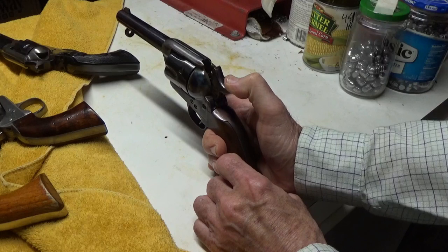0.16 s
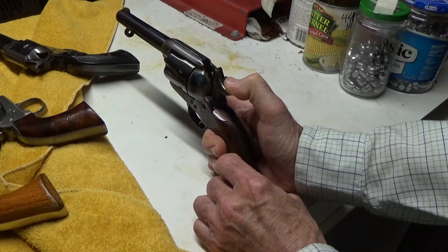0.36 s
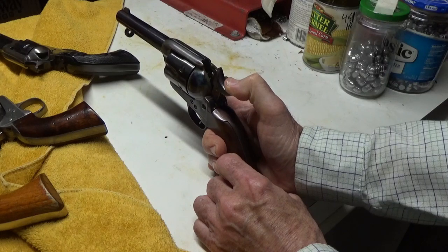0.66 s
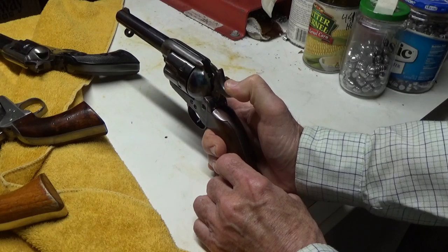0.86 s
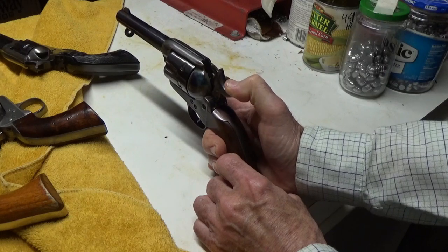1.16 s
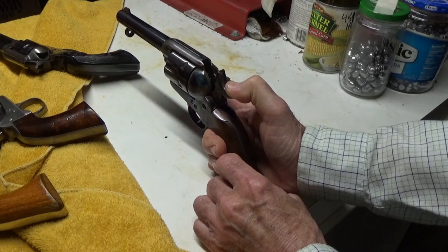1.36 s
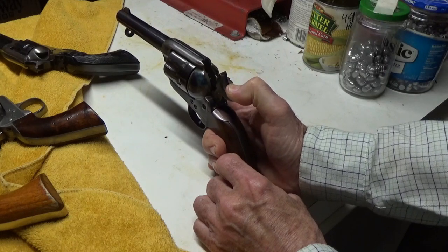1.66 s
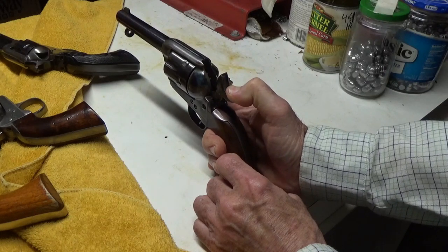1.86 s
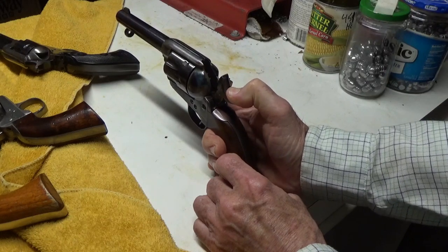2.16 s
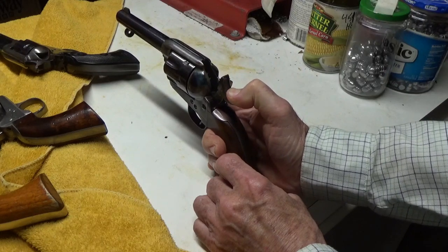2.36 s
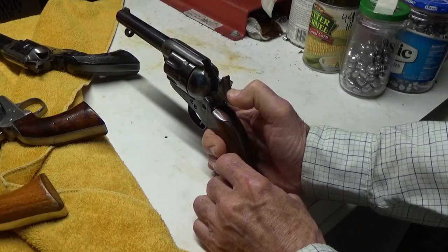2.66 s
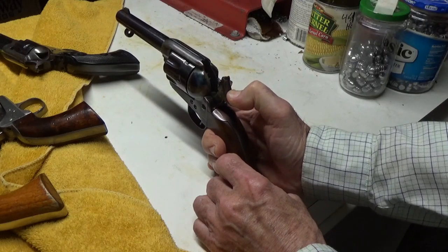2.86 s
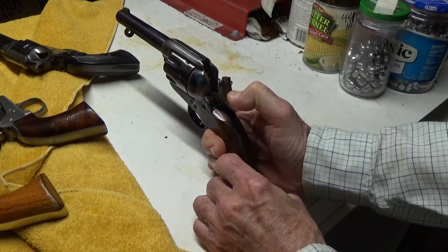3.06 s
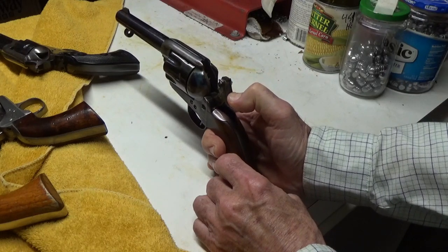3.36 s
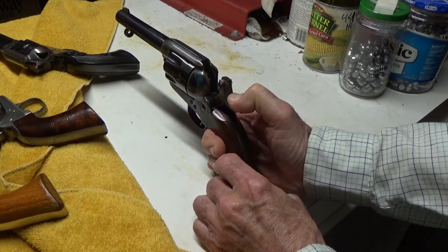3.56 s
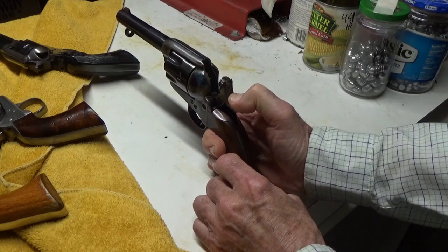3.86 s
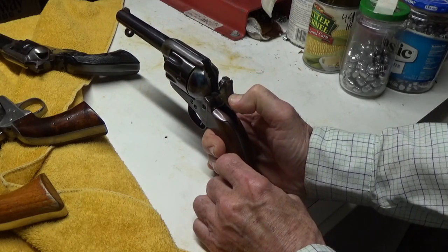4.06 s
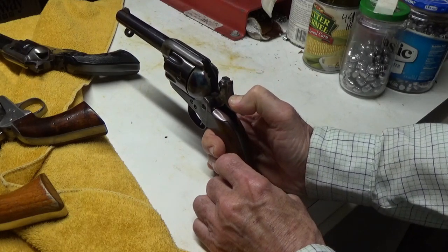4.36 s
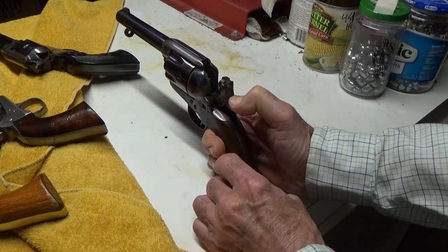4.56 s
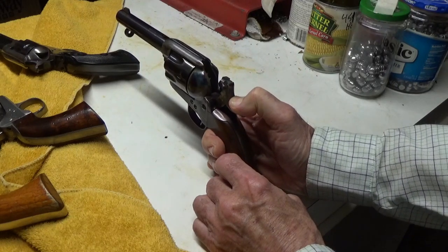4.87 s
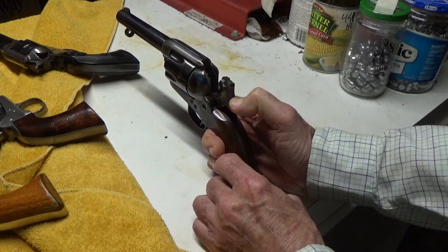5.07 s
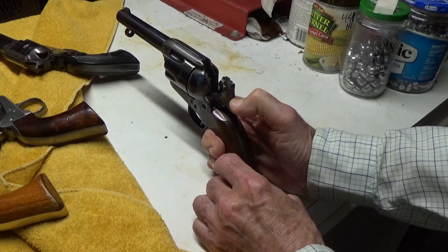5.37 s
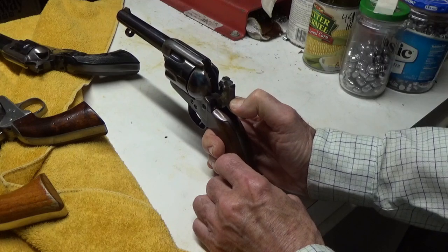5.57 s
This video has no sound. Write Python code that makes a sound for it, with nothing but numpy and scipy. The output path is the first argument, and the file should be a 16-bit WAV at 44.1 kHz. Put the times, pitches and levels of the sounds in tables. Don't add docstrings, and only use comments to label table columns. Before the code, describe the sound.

Three sharp metallic clicks, seconds apart, as a revolver hammer is slowly thumbed back in a quiet small room, over faint hiss.

```python
import sys
import numpy as np
from scipy import signal
from scipy.fft import rfft, irfft
from scipy.io import wavfile
from scipy.ndimage import uniform_filter1d

SR = 44100
rng = np.random.default_rng(int(sys.argv[2]) if len(sys.argv) > 2 else 0)


def gain_from_db(level_db):
    decades = np.asarray(level_db, float) / 20
    return 10 ** decades


def to_wav(s):
    ch = np.atleast_2d(s).T
    pcm = np.round(np.clip(ch, -1, 1) * 32767)
    wavfile.write(sys.argv[1], SR, pcm.astype(np.int16))


N = 252296


def add(track, s, sound):
    i = int(s * SR)
    track[..., i:i + sound.shape[-1]] += sound[..., :N - i]


def unit(x):
    return x / np.abs(x).max()


def shape(x, table):
    hz, gain_db = np.transpose(table)
    n = x.shape[-1]
    bins_hz = np.arange(n // 2 + 1) * SR / n + 1
    gain = gain_from_db(np.interp(np.log(bins_hz), np.log(hz), gain_db))
    return irfft(rfft(x) * gain, n)


def coloured(table, db):
    x = shape(rng.standard_normal(N), table)
    return x * gain_from_db(db) / x.std()


def microphone_hiss():
    # (frequency [Hz], density [dB per Hz])
    middle_hiss = [(20, -10), (87, -1), (250, -2), (900, -7.5), (1200, -5), (1500, -9.5), (11000, -18.5),
                   (14300, -55)]
    # (frequency [Hz], density [dB per Hz])
    side_hiss = [(20, -21.5), (254, -0.45), (1000, -0.8), (1670, -4), (7700, -20), (9440, -18),
                 (11000, -24.5), (14300, -60)]
    return coloured(middle_hiss, -60) + coloured(side_hiss, -62.5) * np.array([[1], [-1]])


def swell(hz, width):
    t = np.arange(int(.08 * SR)) / SR
    envelope = np.e * np.pi * width * t * np.exp(-np.pi * width * t)
    return np.sin(2 * np.pi * hz * t) * envelope


def hands():
    # (time [s], peak level [dB], pitch [Hz], frame knock [dB])
    bumps = [
        (0.3467, -35.5, 320, -9.5),
        (0.6294, -44, 302, -26),
        (2.041, -48.5, 130, -20),
        (2.521, -49.5, 150, -21),
        (2.709, -50.5, 140, -12),
        (3.097, -56, 155, -20),
        (3.258, -53.5, 200, -26),
        (3.999, -53, 137.6, -19.5),
    ]
    out = np.zeros(N)
    frame = swell(1230, 165) + gain_from_db(-1) * swell(500, 120)
    for s, db, hz, frame_db in bumps:
        add(out, s, gain_from_db(db) * (swell(hz, .75 * hz) + gain_from_db(frame_db) * frame))
    room = room_answer([(100, -10.0), (250, -2.5), (600, -1.5), (1500, -6.0), (4000, -12.5)])
    return out, gain_from_db(-39.5) * signal.fftconvolve(out[None], room, axes=1)[:, :N]


def room_answer(colour):
    # (frequency [Hz], t60 [s])
    decay_times = [(150, .33), (300, 0.27), (600, 0.14), (1200, .19), (2500, .17), (5000, .14),
                   (8000, 0.23), (12000, 0.108)]
    # (frequency [Hz], level [dB])
    side_colour = [(100, -11), (300, -12), (600, -2), (1500, -1), (5000, 0), (11000, -3.5)]
    gap_s, side_db = 0.0028, -6
    t = np.arange(SR // 2) / SR
    hz, t60 = np.transpose(decay_times)
    noise = shape(rng.standard_normal((2, len(t))), colour)
    noise = noise / noise.std()
    out = 0
    for centre_hz in 100 * 2 ** np.arange(0, 7.1, .5):
        edges_hz = [centre_hz * 2 ** -.25, centre_hz * 2 ** .25]
        sos = signal.butter(2, edges_hz, "bandpass", fs=SR, output="sos")
        fade = gain_from_db(-60 * t / np.interp(np.log(centre_hz), np.log(hz), t60))
        out = out + fade * signal.sosfiltfilt(sos, noise)
    out = out * np.clip(t / gap_s, 0, 1) ** 2
    side = gain_from_db(side_db) * shape(out[1], side_colour)
    return np.array([out[0] + side, out[0] - side])


def chatter(first_s, blow_db, gap_s, loss_db):
    bounces, jitter = 4, 0.023
    touch_db, rattle_db = -9, -11.5
    k = np.arange(bounces)
    firm_s = first_s + gap_s * (k + jitter * rng.standard_normal(bounces))
    firm_db = blow_db - loss_db * k
    touch = (first_s - gap_s / 2, blow_db + touch_db)
    rattles = zip(firm_s + gap_s / 2, firm_db + rattle_db)
    return [touch, *zip(firm_s, firm_db), *rattles]


def ring(hz, t60, length):
    t = np.arange(int(length * SR)) / SR
    return np.sin(2 * np.pi * hz * t) * np.exp(-np.log(1000) * t / t60)


def resonances(table, length):
    out = 0
    for k, (hz, width, db) in enumerate(table):
        t60 = np.log(1000) / (np.pi * width)
        out = out + (-1) ** k * gain_from_db(db) * width / 300 * ring(hz, t60, length)
    return out


def lockwork(contacts, steel, crack_db):
    out = np.zeros(N)
    body = unit(resonances(steel, .03))
    for s, blow_db in contacts:
        crack = rng.standard_normal(88) * np.exp(-np.arange(88) / (0.00029 * SR))
        crack = np.diff(crack, prepend=0)
        add(out, s, gain_from_db(blow_db) * body)
        add(out, s, gain_from_db(blow_db + crack_db) * crack)
    return signal.sosfilt(signal.butter(2, 2200, "highpass", fs=SR, output="sos"), out)


def cylinder_and_spring(modes):
    return sum(gain_from_db(db) * ring(hz, t60, 0.294) for hz, db, t60 in modes)


def bench(modes, thud, start_s, bench_db, thud_db):
    out = np.zeros(N)
    boom = 0
    for hz, db, t60 in modes:
        boom = boom + gain_from_db(db) * (ring(hz, t60, .4) - 0.36 * ring(hz + 17, t60, .4))
    boom = boom * (1 - np.exp(-np.arange(len(boom)) / (0.019 * SR)))
    add(out, start_s, gain_from_db(bench_db) * unit(boom))
    grip = sum((-1) ** k * gain_from_db(db) * swell(hz, width) for k, (hz, width, db) in enumerate(thud))
    add(out, start_s, gain_from_db(thud_db) * grip)
    return out


def wall_echo(low):
    dull = signal.sosfilt(signal.butter(2, 700, fs=SR, output="sos"), low)
    return gain_from_db(-11.5) * np.roll(dull, int(.019 * SR))


def at_two_ports(steel_clicks):
    return steel_clicks + gain_from_db(-20.5) * np.array([[1], [-1]]) * np.roll(steel_clicks, 12)


def scene():
    # (first firm contact [s], blow [dB], time between bounces [s], loss per bounce [dB], thud delay [s])
    clicks = [
        (.8270, -9, .001017, 0.5, -0.00039),
        (3.4628, 0.6, .00104, 5.5, .0006),
        (5.4226, -7.5, .00104, 4, .0008),
    ]
    # (bench [dB], thud [dB], bare crack [dB], room [dB], ring [dB])
    knocks = [
        (-22, -18.5, -3, -30, -38.5),
        (-28, -24.5, -8, -27.5, -34.5),
        (-39, -33.5, -4, -36, -44),
    ]
    # (frequency [Hz], width [Hz], level [dB])
    steel_modes = [
        [(1838, 80, -19), (3245, 99, -8.5), (3550, 90, -13), (5800, 469, -6.5), (6730, 300, -3.5),
         (7580, 330, -5.5), (8570, 160, -12.5), (8750, 640, -9.5), (10750, 250, -9)],
        [(1922, 370, -22.5), (2760, 230, -12), (3805, 280, -12.5), (4850, 450, -6.5), (6200, 580, -6.5),
         (7970, 253, -11), (9550, 220, -2.5), (10920, 440, -6)],
        [(3000, 1000, -10.5), (3830, 180, -17), (4260, 180, -14), (5470, 300, -7.5), (6620, 310, -3),
         (7850, 620, -10), (8520, 470, -10.5), (10220, 280, -8), (10860, 190, -8.5)],
    ]
    # (frequency [Hz], level [dB], t60 [s])
    long_rings = [
        [(1935, -15, 0.11), (2242, -0.5, 0.081), (5830, -5.5, .08), (6900, -13, .1), (7860, -5, 0.1),
         (7500, 0.7, .13), (7250, -3, .11), (8300, -12, 0.15)],
        [(2790, -5.5, .1), (4650, -9, 0.16), (6194, -9, .08), (7240, -3, .09), (8200, -5, .15), (9500, -1, .12),
         (10000, 0, .12)],
        [(1960, -8, .12), (4300, -5, 0.1), (5550, -1.5, 0.13), (5600, -4, .08), (7500, -3, 0.14),
         (8000, 4, 0.12), (10000, -6, .06)],
    ]
    # (frequency [Hz], level [dB], t60 [s])
    bench_modes = [
        [(140, -16, 0.18), (254, -16, 0.33), (274, -23, .45), (320.5, -3.5, 0.22), (367, -9, 0.16),
         (443, -6, 0.17), (553, -4, 0.1), (710, -20, 0.14), (1276, -17, 0.089)],
        [(209.2, -24, 0.199), (344, -6, 0.16), (472.5, -11.5, 0.18), (545, -1, .2), (561, -2, 0.12),
         (633, -12, .15), (800, -4.5, 0.16), (951, -14, .16), (1210, -12, 0.15), (1290, -14, 0.18)],
        [(256, -13, 0.15), (331.3, -3, 0.15), (442, 0.5, 0.09), (1200, -1.5, 0.088), (1280, -23, .18)],
    ]
    # (frequency [Hz], width [Hz], level [dB])
    grip_thuds = [
        [(231, 102, -11), (392, 100, -2), (476, 100, -10), (803, 98, -23), (1115, 68, -14), (1223, 88, -9),
         (1610, 59, -18.5), (1915, 54, -16), (2295, 90, -34)],
        [(418, 120, -4), (786, 120, -15), (1230, 115, -0.5), (1607, 110, -10.5), (1930, 98, -10)],
        [(427, 98, -2), (1240, 115, -5), (1606, 37, -12), (1924, 200, -0.5)],
    ]
    # (frequency [Hz], density [dB per Hz])
    wall_colours = [
        [(100, -31), (330, -5), (600, -20.5), (1900, -21.5), (5000, -27), (7720, -25.5), (11000, -32.5),
         (12500, -68)],
        [(100, -26), (332, -4.5), (800, -4), (1700, -10.5), (4030, -13.5), (9590, -15), (11000, -14),
         (12500, -60)],
        [(150, -23), (331, -3.5), (650, -27.5), (1730, -13.5), (4000, -17), (5270, -24), (11000, -22.5),
         (12500, -65)],
    ]
    low, tail = hands()
    steel_clicks = 0
    for click, knock, steel, rings, modes, thud, colour in zip(
            clicks, knocks, steel_modes, long_rings, bench_modes, grip_thuds, wall_colours):
        first_s, blow_db, gap_s, loss_db, delay_s = click
        bench_db, thud_db, crack_db, room_db, ring_db = knock
        start_s = first_s + delay_s
        contacts = chatter(first_s, blow_db, gap_s, loss_db)
        steel_clicks = steel_clicks + lockwork(contacts, steel, crack_db)
        add(steel_clicks, start_s, gain_from_db(ring_db) * cylinder_and_spring(rings))
        low = low + bench(modes, thud, start_s, bench_db, thud_db)
        add(tail, start_s, gain_from_db(room_db) * room_answer(colour))
    arriving = at_two_ports(steel_clicks) + low + wall_echo(low) + tail
    bass_cut = signal.butter(4, 118, "highpass", fs=SR, output="sos")
    return signal.sosfilt(bass_cut, arriving) + microphone_hiss()


def roll_off(x):
    return signal.sosfilt(signal.butter(12, 16510, fs=SR, output="sos"), x)


def record(dry):
    # (start [s], end [s], silent above [Hz], depth [dB])
    dropouts = [
        (3.4468, 3.4585, 1300, -45),
        (3.4533, 3.4585, 20, -51),
        (.8205, .8232, 1380, -10),
    ]
    top_hz = 10930
    t = np.arange(N) / SR
    for start_s, end_s, above_hz, depth_db in dropouts:
        high = signal.sosfiltfilt(signal.butter(4, above_hz, "highpass", fs=SR, output="sos"), dry)
        gap = uniform_filter1d(1. * ((t > start_s) & (t < end_s)), size=44)
        dry = dry - (1 - gain_from_db(depth_db)) * gap * high
    low = signal.sosfiltfilt(signal.ellip(8, .1, 46, top_hz, fs=SR, output="sos"), dry)
    trace = shape(dry, [(top_hz, -30), (11700, -2), (12500, 0), (13400, 8), (14500, 0.5), (15500, -6),
                        (16200, -9), (17000, -70)])
    strength = uniform_filter1d(trace ** 2, size=256)
    trace = trace * strength / (strength + gain_from_db(-21) ** 2)
    return roll_off(low + gain_from_db(-22) * trace)


dry = scene()
out = record(dry)
to_wav(out)
```